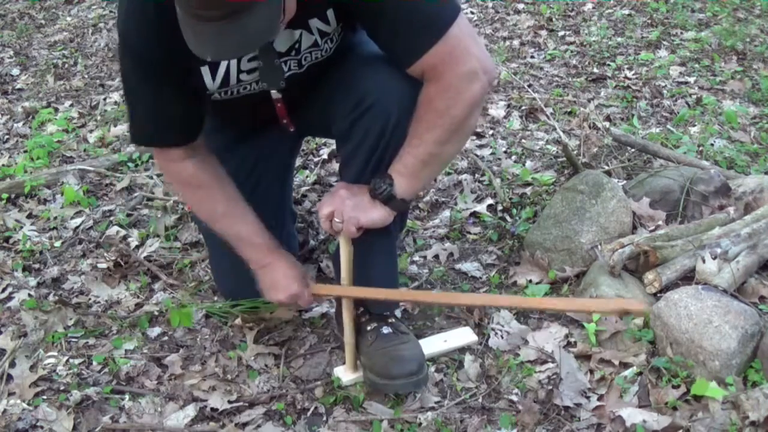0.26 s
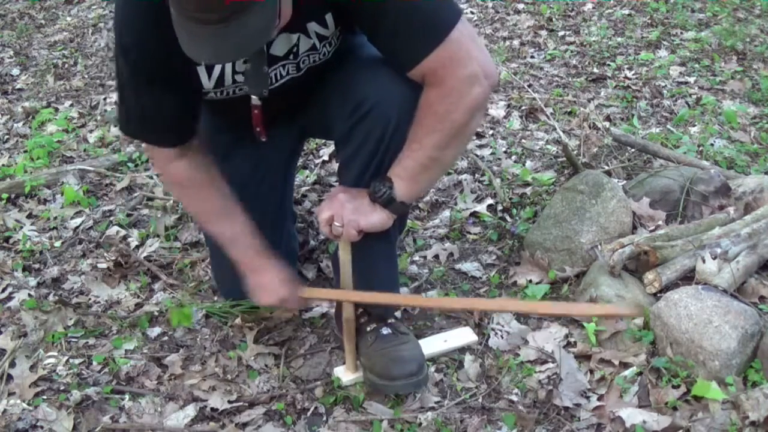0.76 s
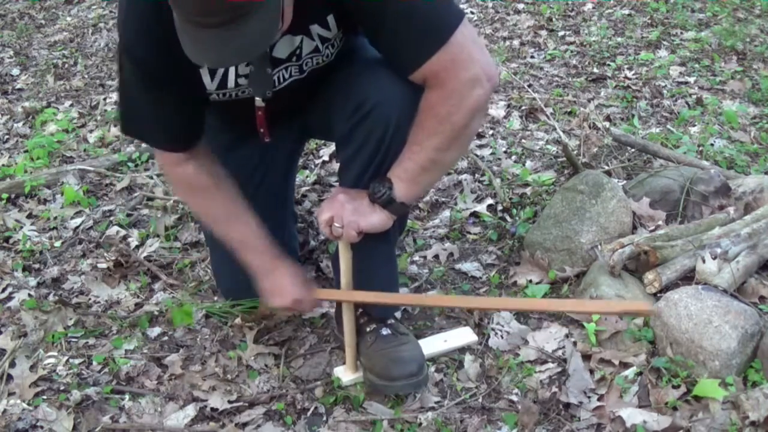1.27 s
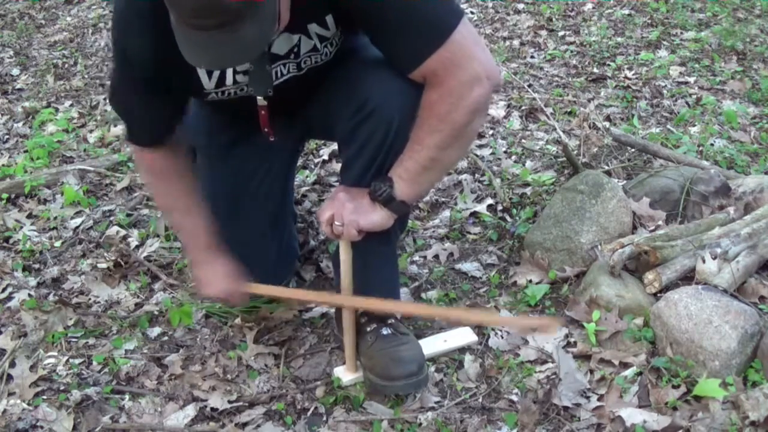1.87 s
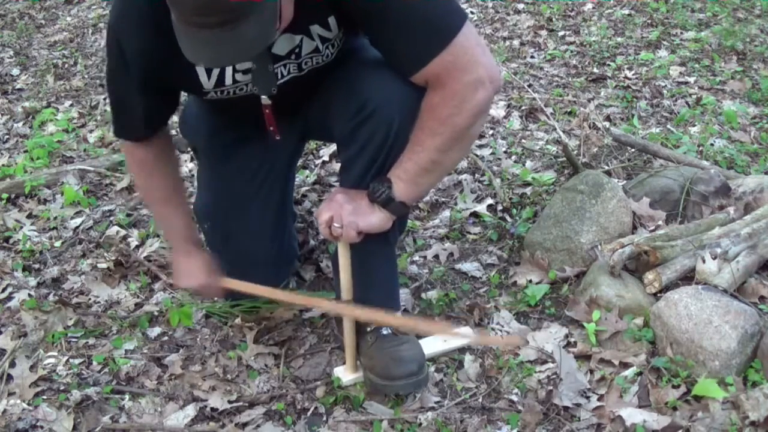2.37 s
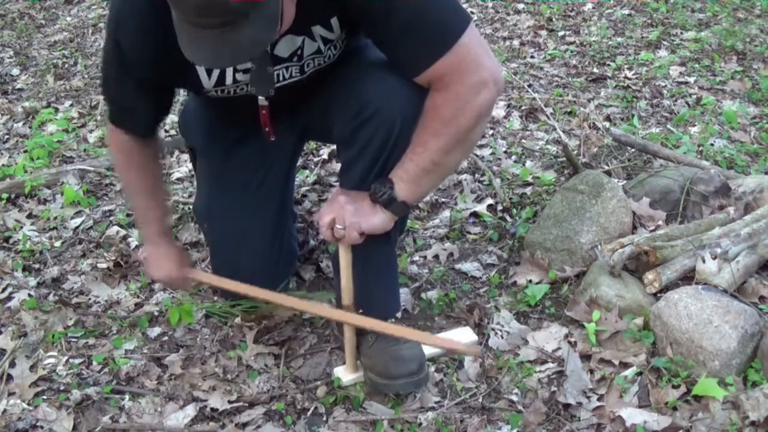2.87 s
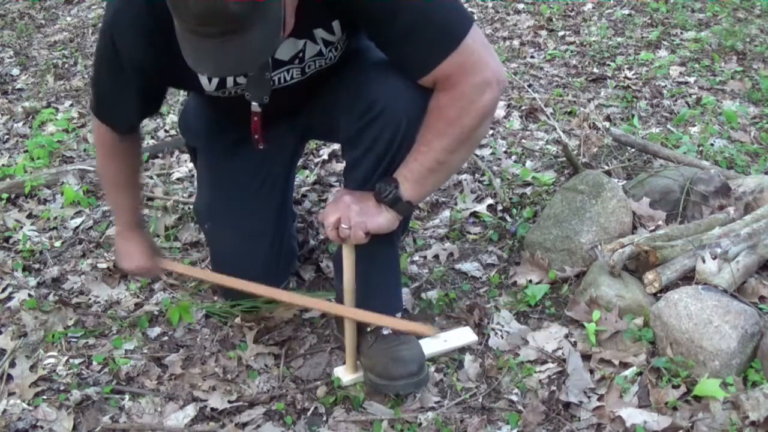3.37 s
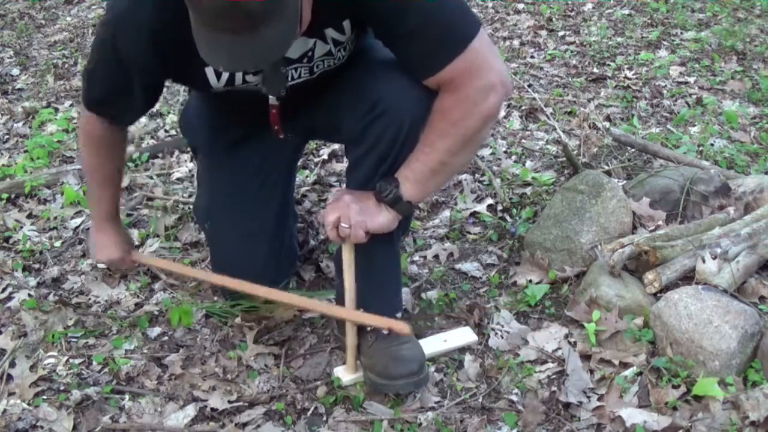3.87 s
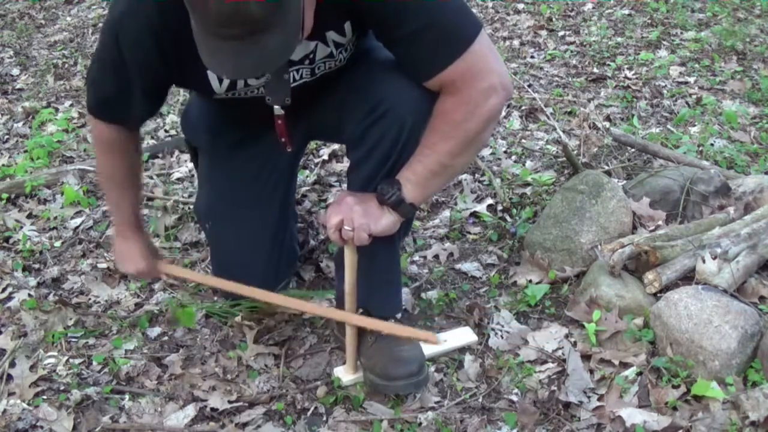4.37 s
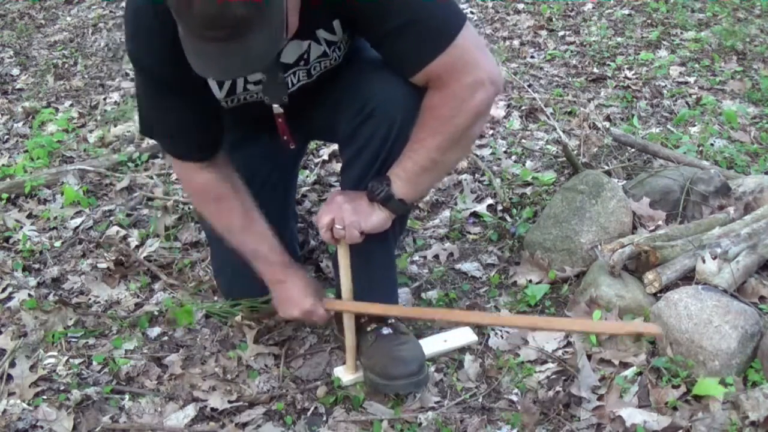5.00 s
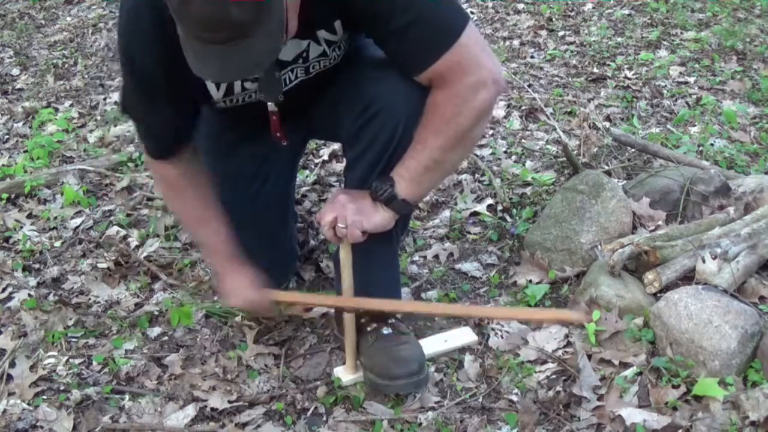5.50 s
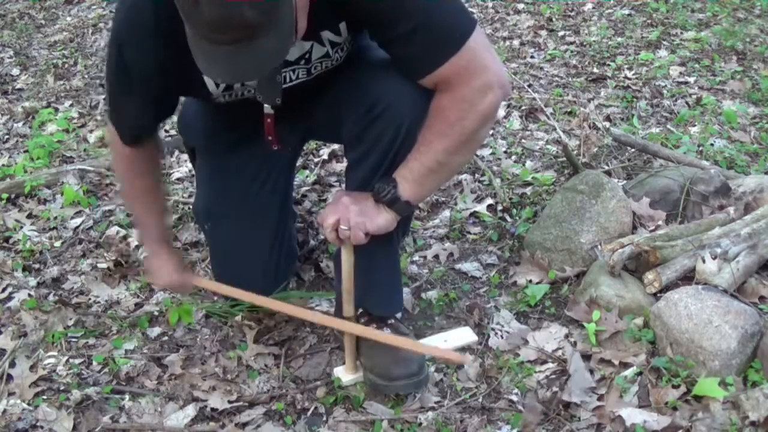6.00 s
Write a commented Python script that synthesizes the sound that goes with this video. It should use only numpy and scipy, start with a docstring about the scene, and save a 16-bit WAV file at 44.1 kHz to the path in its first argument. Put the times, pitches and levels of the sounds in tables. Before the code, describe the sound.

Rapid to-and-fro wooden rubbing, early chirpy squeaks turning to rougher grinding with brittle snaps, outdoors in breezy woodland with a far bird whistling.

```python
"""On the forest floor, a bow drill at work: a cord spins a wooden spindle to and fro in its hearth board.
Each stroke is filtered noise and tiny random slips that groan, grind, hiss and crackle with the speed.
Early turns squeak with sliding, rasping harmonics; later the tip bites and grinds, and clicks snap like fibres.
Short noise bursts ring the wood as knocks, slow-swelling noise makes the wind, and noise a hush of woods.
A bird far away whistles with sliding sine tones."""
import sys
import numpy as np
from scipy import signal
from scipy.fft import rfft, irfft
from scipy.io import wavfile
from scipy.ndimage import uniform_filter1d

SR = 44100
rng = np.random.default_rng(int(sys.argv[2]) if len(sys.argv) > 2 else 0)


def master(y):
    """Save y as 16-bit WAV."""
    cut = np.clip(np.atleast_2d(y).T, -1, 1)
    pcm = np.round(cut * 32767)  # scale
    wavfile.write(sys.argv[1], SR, pcm.astype(np.int16))


N = 275625
TIME = np.arange(N) / SR

# The spindle catches and slips as it reverses. Each row: start in seconds, length in seconds, level in dB,
# start pitch in Hz, end pitch in Hz, level of the pure ring in dB.
SQUEAKS = [(0.038, 0.015, -12.5, 1710, 2203, -4), (0.326, 0.011, -15, 1860, 2215, -11),
           (.594, 0.01, -12, 2040, 2145, -28), (0.8407, 0.017, -18, 1830, 2240, 5.5),
           (1.096, 0.013, -16.5, 1970, 2200, 4.5), (1.3284, 0.0101, -10.5, 1910, 2320, -22),
           (1.572, 0.0069, -14, 2040, 2190, -23), (4.356, 0.0033, -22.5, 1810, 1750, 10)]
# Rings of spindle and board that single slips set off.
# Each row: pitch in Hz, basic width in Hz, relative level in dB.
WOOD_MODES = [(946, 57, -13), (1804, 170, -6), (1860, 110, -1.5), (2990, 280, -4), (3197, 420, 5),
              (4004, 90, -9.5), (4460, 310, 1.5)]
# Tone colour of a snapping fibre. Each row: frequency in Hz, relative level in dB.
SNAP_COLOUR = [(600, -23), (2500, -26), (4800, -10), (6500, -5.5), (7600, -24), (9000, -1.5), (10400, 1.5),
               (12500, -4.5), (14000, -23.5), (16000, -22)]


def gain_of(db):
    """Turns decibels into a gain."""
    return 10 ** (np.asarray(db) / 20)


def evened(x):
    """Scales a sound to an rms (average strength) of 1."""
    return x / np.sqrt(np.mean(x ** 2) + 1e-20)


def peaked(x):
    """Scales a sound so that its tallest peak is 1."""
    return x / (abs(x).max() + 1e-20)


def read(points, hz):
    """Reads a table of frequencies and values between its rows, on a log-frequency axis."""
    f, value = np.transpose(points)
    return np.interp(np.log(hz + 1), np.log(f + 1), value)


def add(mix, s, sound):
    """Mixes a sound in at time s, in seconds."""
    part = mix[max(round(s * SR), 0):][:len(sound)]
    part += sound[:len(part)]


def colour(x, spectrum, size=2048):
    """Filters x to a given spectrum, with a response that starts at once and never ahead of the sound."""
    hz = abs(np.fft.fftfreq(size, 1 / SR))
    log_gain = np.log(gain_of(read(spectrum, hz)))
    # the Hilbert transform gives the phase that goes with this spectrum
    response = np.fft.ifft(np.exp(np.conj(signal.hilbert(log_gain)))).real[:size // 2]
    return signal.oaconvolve(x, response)[:len(x)]


def ring(x, hz, width_hz):
    """One damped mode (a way the wood rings), with gain 1 at its centre; a wider mode dies sooner."""
    r = np.exp(-np.pi * width_hz / SR)
    return 2 * signal.lfilter([1 - r], [1, -r * np.exp(2j * np.pi * hz / SR)], x).real


def wander(rate_hz):
    """Smooth random ups and downs of rms 1, fading out above a given rate."""
    hz = np.fft.rfftfreq(N, 1 / SR)
    slow = rfft(rng.standard_normal(N)) / (1 + (hz / rate_hz) ** 4)
    return evened(irfft(slow, N))


def chance_times(per_s):
    """Random moments, one for each whole event that a moving rate adds up to."""
    due = np.cumsum(per_s) / SR
    count = int(due[-1])
    marks = np.arange(count) + rng.random(N)[:count]
    return np.interp(marks, due, TIME)


def bow():
    """Spindle speed 0-1 and the drive of groan, grinding and hiss; the brighter sink further at each turn."""
    # The bow turns round, at the near and the far end by turns.
    # Each row: moment in seconds, rubbing that goes on through the turn in dB.
    turns = [(-0.2, 1), (0.042, -20), (0.317, -7), (0.574, -2.5), (0.835, -5.5), (1.092, -8), (1.322, -1.5),
             (1.551, -8), (1.785, -6), (2.02, -7.5), (2.252, -32), (2.493, -14), (2.737, -24), (2.977, -12),
             (3.202, -30), (3.444, -19), (3.667, -12), (3.905, -10), (4.127, -28), (4.351, -26),
             (4.569, -17), (4.797, -15), (5.007, -15), (5.237, -4), (5.446, -19), (5.656, -13),
             (5.872, -19), (6.1, -15), (6.33, -15)]
    # The tip wears in, bites, then glazes.
    # Each row: time in seconds, board groan in dB, grinding in dB, dry hiss in dB.
    wear = [(0.3, -48, -41, -32), (1.199, -43, -37.5, -32), (1.75, -44, -36, -28), (2.15, -43, -30, -31),
            (3.2, -36.5, -26, -30.5), (4.4, -33.5, -30.5, -31.5), (5.35, -32.5, -30.5, -30.5),
            (6.1, -34, -34, -33)]
    push_db = 0.6  # the push is harder than the pull, dB either way
    stick_s, stick_db = 0.012, -7  # before a squeak the spindle sticks, and its rubbing drops away

    turn_s, rest_db = np.transpose(turns)
    swing = -np.sin(np.pi * np.interp(TIME, turn_s, np.arange(len(turn_s))))  # positive on the push
    speed = abs(swing)
    rest = gain_of(np.interp(TIME, turn_s, rest_db))
    stuck = sum(np.exp(-abs(TIME - start + stick_s / 2) / stick_s) for start, *_ in SQUEAKS)
    drive = np.hypot(rest * (1 - speed), speed ** 0.95) * gain_of(push_db * swing + stick_db * stuck)

    s, *levels = np.transpose(wear)
    powers = (.85, 1.1, 1.15)
    return speed, [drive ** power * gain_of(np.interp(TIME, s, db)) for db, power in zip(levels, powers)]


def grit(per_s, spread_db):
    """Tiny slips of uneven size, at a rate that may move."""
    size = gain_of(spread_db * np.minimum(rng.exponential(1, N), 4.5))
    happens = rng.random(N) < per_s / SR
    return evened(size * rng.standard_normal(N) * happens)


def sing(modes):
    """Friction keeps every mode ringing; now one, now another stands out for a few milliseconds."""
    total = np.zeros(N)
    for hz, width, db in modes:
        once = ring(rng.standard_normal(N), hz, 1.6 * width)
        twice = ring(once, hz, 1.6 * width)
        total += gain_of(db) * evened(twice * gain_of(4.1 * wander(43)))
    return total


def spindle():
    """The tip's slips ring board and spindle; their pressure is uneven around each turn."""
    # Tone colours of the rubbing. Each row: frequency in Hz, relative level in dB.
    groan_colour = [(200, -48), (450, -16), (720, -14), (950, 2), (1300, -5.5), (1800, 3), (2200, -3.5),
                    (2600, 1.5), (3400, -47), (6000, -54)]
    grind_colour = [(2000, -19.5), (2600, -9.5), (3100, -2), (3400, -2), (3700, -6.5), (4100, 2),
                    (4450, -0.5), (4900, -2.5), (5600, -40), (7000, -24.5)]
    hiss_colour = [(2500, -15.5), (4400, -25), (5300, -2.5), (6000, 4), (6350, -1), (6700, 0),
                   (7500, -15.5), (7950, 5.5), (8500, -5), (10100, 10.5), (10800, 3), (11900, 0.5),
                   (13500, -9), (16000, -23)]
    # High rings of the dry tip. Each row: pitch in Hz, basic width in Hz, relative level in dB.
    tip_modes = [(4510, 490, 5), (6010, 200, 3), (8080, 370, -0.5), (9720, 160, -1), (11100, 300, -28)]

    speed, (groan, grind, hiss) = bow()
    chatter = wander(90)
    slips = grit(3000 + 9000 * speed, 1.1)  # more slips a second when the spindle is fast
    groaning = colour(grit(2500, 1.6), groan_colour)
    low = groan * evened(groaning * gain_of(3.0 * chatter + 1.9 * wander(50)))
    middle = grind * evened(colour(slips, grind_colour) * gain_of(2.0 * chatter + 1.8 * wander(84)))
    high = hiss * evened(colour(slips, hiss_colour) * gain_of(1.2 * chatter + 1.5 * wander(110)))

    # the pressed wood and the dry tip sing in their own modes
    singing = grind * evened(sing(WOOD_MODES) * gain_of(2.0 * chatter))
    ringing = hiss * evened(sing(tip_modes))

    # coarse crumbs jolt the wood, and charred dust crackles between the surfaces
    jolts = grit(130, 2.0)
    jolted = sum(gain_of(db) * evened(ring(jolts, hz, 2 * width)) for hz, width, db in WOOD_MODES)
    crumbs = grind * evened(jolted)
    crackle = hiss * speed * evened(colour(grit(140, 2.2), SNAP_COLOUR))

    rub = low + gain_of(-1.5) * middle + gain_of(-2.0) * high + gain_of(-9.0) * crackle
    return rub + gain_of(-3.5) * singing + gain_of(-7) * crumbs + gain_of(-6.5) * ringing


def gust(peak_s, length, db):
    """Level in dB of a gust that swells and dies in one arch, 3 dB down at the ends of its length."""
    return db - 10 * np.log10(1 + (2 * (TIME - peak_s) / length) ** 4)


def buffet(spectrum, level_db, lumpy_db):
    """Lumpy turbulence that reaches the two microphone ports partly alike and out of step."""
    # How alike the wind is at the two ports. Each row: frequency in Hz, likeness from 0 to 1.
    likeness = [(40, .87), (80, .87), (170, .68), (350, .75), (600, .6), (900, .5)]
    # How far the right port lags. Each row: frequency in Hz, phase in radians.
    lag = [(100, 0), (170, .55), (290, 1.5), (450, 1.85), (900, 1.8)]

    hz = np.fft.rfftfreq(N, 1 / SR)
    left, other = rfft(rng.standard_normal((2, N))) * gain_of(read(spectrum, hz))
    same = np.clip(read(likeness, hz), 0, 1)
    right = (same * left + np.sqrt(1 - same ** 2) * other) * np.exp(-1j * read(lag, hz))
    ports = irfft(np.array([left, right]), N) * gain_of(lumpy_db * wander(37.0))
    return gain_of(level_db) * ports / ports.mean(0).std()


def wind():
    """Gusts over a light breeze give a deep rumble and, when strong, a flutter above it."""
    # Gusts on the microphone.
    # Each row: strongest moment in seconds, length in seconds, rumble in dB, flutter in dB.
    gusts = [(0.25, 0.042, -23.5, -28.5), (0.35, 0.062, -26.5, -28.5), (0.52, 0.05, -28, -40),
             (1.249, 0.08, -24.5, -32.5), (1.347, 0.15, -24.5, -28), (1.707, 0.12, -22.5, -29),
             (1.82, 0.085, -24, -28.5), (2.005, 0.1, -22, -28), (2.243, 0.12, -27.5, -31),
             (2.492, 0.11, -26, -35), (3.216, 0.18, -25.5, -32), (3.783, 0.11, -23.5, -28),
             (3.988, 0.14, -28, -30.5), (4.158, 0.12, -19, -26), (4.301, 0.12, -22, -30.5),
             (5.052, 0.18, -25, -31), (5.262, 0.08, -25, -33), (5.433, 0.05, -26.5, -31),
             (5.57, 0.06, -25, -33), (5.895, 0.032, -23, -28), (6.009, 0.07, -24.5, -26),
             (6.167, 0.068, -24.5, -28.5)]
    # The breeze between gusts. Each row: time in seconds, level in dB.
    breeze = [(0.0, -34.5), (0.68, -30), (0.85, -37.5), (1.12, -42), (1.45, -27.5), (2.7, -33), (2.9, -28),
              (4.35, -30), (4.7, -32.5), (6.25, -32.5)]
    # Tone colours of the wind. Each row: frequency in Hz, relative level in dB.
    rumble_colour = [(15, -12), (30, -18), (60, -2), (130, 1), (210, -1), (300, -12.5), (500, -51),
                     (1500, -58), (4000, -95)]
    flutter_colour = [(120, -24), (250, 0), (330, -2), (450, -7), (650, -16), (1100, -31), (2500, -45),
                      (6000, -90)]

    breeze_db = np.interp(TIME, *np.transpose(breeze))
    rumbles = [gust(s, length, db) for s, length, db, _ in gusts]
    flutters = [gust(s, length, db) for s, length, _, db in gusts]
    rumble_db = np.max([breeze_db] + rumbles, axis=0)
    flutter_db = np.max([breeze_db - 8.5] + flutters, axis=0)  # the breeze flutters less than it rumbles
    return buffet(rumble_colour, rumble_db, lumpy_db=3.0) + buffet(flutter_colour, flutter_db, lumpy_db=3.0)


def forest():
    """The faint even hush of the woods: steady noise, partly shared by the two ears."""
    # Tone colour of the hush. Each row: frequency in Hz, relative level in dB.
    hush_colour = [(50, 0), (400, -1), (1000, -3), (2300, -9), (3200, -7), (4500, -12), (6000, -16),
                   (9000, -17), (10200, -12), (11500, -17), (13000, -22), (16000, -25)]
    near, left, right = (evened(colour(z, hush_colour)) for z in rng.standard_normal((3, N)))
    return gain_of(-45.5) * (near + .5 * np.array([left, right]))


def knock(db, hz):
    """A short rattle of contact rings the board, with a crack of treble on top."""
    # Tone colours of the wood and of the crack. Each row: frequency in Hz, relative level in dB.
    wood_colour = [(200, -20), (550, -7.5), (950, -0.5), (1500, -2), (2400, -3.5), (3200, -9.5),
                   (4500, -7.5), (9000, -52)]
    crack_colour = [(500, -20.5), (2000, -9), (3500, -8.5), (4600, 9.5), (5400, 2.5), (6400, 4),
                    (7600, -16), (10000, 7.5), (13000, -6), (16000, -35)]

    t = np.arange(SR // 20) / SR
    rattle, crack = rng.standard_normal((2, len(t)))
    contact = rattle * (np.exp(-t / 0.0036) + 0.033 * np.exp(-t / 0.0063))
    contact[0] += 2.5  # the first touch
    wood = peaked(colour(contact, wood_colour))
    wood = peaked(wood + .35 * peaked(ring(wood, hz, 300)))
    edge = peaked(colour(crack * np.exp(-t / 0.0032), crack_colour))
    # most knocks have the same crack; only the softest have less
    return gain_of(db + 3.0) * wood + gain_of(min(-11.5, db + 3.5)) * edge


def knocks():
    """The spindle rattles in its socket: knocks at set moments, and chance taps that thicken as the board
    groans."""
    # Knocks at set moments. Each row: start in seconds, relative level in dB, strongest ring in Hz.
    set_knocks = [(0.028, -17.5, 1910), (0.137, -17.5, 830), (0.172, -23.5, 1060), (0.198, -18.5, 910),
                  (0.284, -21, 1590), (0.539, -11.5, 1060), (0.658, -18, 950), (0.805, -24.5, 1030),
                  (1.048, -21, 1824), (1.283, -15.5, 1010), (1.46, -16, 1090), (1.554, -11.5, 2400),
                  (1.631, -18.5, 850), (1.661, -16, 912), (1.964, -12.5, 2450), (2.153, -15.5, 1760),
                  (2.65, -15, 1950), (3.102, -13, 1420), (3.157, -15, 1540), (3.455, -15.5, 1860),
                  (3.571, -13, 1860), (3.779, -15, 1560), (3.794, -11, 1790), (4.079, -14, 1840),
                  (4.302, -13.5, 870), (4.357, -16, 1320), (4.673, -17.5, 1820), (4.847, -22, 3050),
                  (4.924, -14.5, 1840), (5.393, -17.5, 1680), (5.532, -11.5, 1590), (5.608, -10, 1330),
                  (5.647, -9, 1890), (5.732, -19.5, 840), (5.831, -16, 1620), (6.195, -17.5, 880),
                  (6.238, -11.5, 1560)]
    taps_per_s, tap_db, tap_spread_db = 4.0, -21.5, 1.5  # average rate, relative level and its spread

    out = np.zeros(N)
    _, (groan, *_) = bow()
    for s, db, hz in set_knocks:
        add(out, s, knock(db, hz))
    for s in chance_times(taps_per_s * groan / groan.mean()):
        hz = WOOD_MODES[rng.integers(2)][0]  # one of the two low modes
        add(out, s, knock(tap_db + tap_spread_db * rng.standard_normal(), hz))
    return out


def squeaks():
    """Rasping stick-slip pulses slide in pitch and settle as their second harmonic swells to a pure ring."""
    # Tone colour of the squeaking spindle. Each row: frequency in Hz, relative level in dB.
    body_colour = [(1000, -27), (2200, -11.5), (3000, -0.5), (4300, 0), (5200, 2.5), (6200, -0.5),
                   (7400, -12.5), (8600, -0.5), (10000, 3), (11000, -1.5), (13000, -8.5), (16000, -9)]

    out = np.zeros(N)
    t = np.arange(SR // 20) / SR
    for s, length, db, start_hz, end_hz, ring_db in SQUEAKS:
        u = np.minimum(t / length, 1)  # progress from 0 to 1
        jitter, scrape = rng.standard_normal((2, len(t)))
        unsettled = (1 - u) ** 3
        shake_hz = 50 * evened(uniform_filter1d(jitter, size=30))
        hz = end_hz + unsettled * (start_hz - end_hz + shake_hz)
        phase = 2 * np.pi * np.cumsum(hz) / SR

        pulses = np.zeros(len(t))
        for k in range(1, 7):  # six harmonics of uneven strength
            strength = gain_of(2 * rng.standard_normal())
            pulses += strength * np.cos(k * phase + rng.uniform(0, 2 * np.pi))
        rasp = evened(colour(pulses + 1.1 * scrape, body_colour))
        bite = abs(np.sin(np.pi * u ** .5)) ** 1.3  # swells early
        swell = abs(np.sin(np.pi * u ** 1.35)) ** 1.7  # swells late
        tone = gain_of(ring_db) * swell * np.sin(2 * phase)
        after = gain_of(-19) * u * np.exp(-t / 0.011) * (np.sin(phase) + np.sin(2 * phase))
        add(out, s, gain_of(db) * (0.8 * bite * rasp + 1.24 * tone + 2 * after))
    return out


def snap(db):
    """One sharp click with its own ring and a few milliseconds of scatter; loud ones are brighter."""
    # Tone colour of the dull mid-range part. Each row: frequency in Hz, relative level in dB.
    dull_colour = [(500, -42), (2000, -20), (3500, -3), (4600, 11), (5400, 5.5), (6400, 8.5), (7600, 13.5),
                   (10000, -39)]

    t = np.arange(SR // 50) / SR
    click = 0.12 * rng.standard_normal(len(t)) * np.exp(-t / 0.0021)
    click[0] += 1
    fibre = peaked(ring(click, rng.uniform(8900, 14100), 1350))
    dull_db = -17 - db + 4.5 * rng.standard_normal()  # a louder snap has a smaller share of it
    dull = gain_of(dull_db) * peaked(colour(click, dull_colour))
    sound = peaked(colour(click, SNAP_COLOUR)) + 0.32 * fibre + dull
    return gain_of(db + 1.0) * peaked(sound)


def snaps():
    """Sharp clicks snap in quick fading runs, more often as the wood dries and chars."""
    # Runs at set moments. Each row: start in seconds, relative level of the first snap in dB, snaps in the run.
    set_runs = [(0.1503, 0, 1), (0.1806, -8.5, 2), (0.4874, -8.5, 1), (0.5795, -2.5, 2), (0.6971, -5, 2),
                (0.9735, 1, 1), (1.1812, 0.5, 2), (1.4357, 1, 1), (1.4608, -3.5, 2), (1.5137, -1, 2),
                (1.6034, 1, 2), (1.7178, -2, 1), (1.9114, -10, 2), (2.0557, -3, 1), (2.104, -7, 1),
                (2.1323, -3.5, 1), (2.3194, -1, 2), (2.386, -6, 2), (3.0595, -1.5, 1), (3.333, -4.5, 1),
                (3.3972, -2, 1), (3.4297, -3, 2), (3.521, -1.5, 2), (3.5592, -1.5, 1), (3.8511, -5, 2),
                (3.8873, -9, 1), (4.0402, -6.5, 1), (4.2883, -6, 1), (4.4493, -5, 1), (4.4719, -6, 2),
                (4.4903, -0.5, 1), (4.6162, -2, 1), (4.713, 1, 2), (4.7577, -5, 2), (4.8867, 2.5, 1),
                (5.2098, 2, 3), (5.25, -12.5, 2), (5.3173, 3, 2), (5.3473, 1, 2), (5.6193, 1, 1),
                (5.6465, -5, 2), (5.677, 3, 5), (5.7385, -0.5, 2), (6.0236, 2, 3), (6.0804, -5.5, 2),
                (6.1122, -5.5, 3), (6.2024, -1, 2), (6.2314, -2, 1)]
    # Further snaps come by chance as the spindle turns. Each row: time in seconds, runs a second at full speed.
    chance_rate = [(0.5, 5), (2.0, 15), (6.0, 24)]
    # relative level at full speed, its change at rest and its spread in dB, and the share that come as pairs
    full_db, rest_db, spread_db, pair_share = -9.0, -9.5, 1.5, 0.36
    run_gap_s, run_fade_db = 0.0076, 3.5  # the snaps of a run follow closely, each a little weaker

    out, runs = np.zeros(N), list(set_runs)
    speed, _ = bow()
    for s in chance_times(np.sqrt(speed) * np.interp(TIME, *np.transpose(chance_rate))):
        slowness = 1 - np.interp(s, TIME, speed)
        db = full_db + rest_db * slowness + spread_db * rng.standard_normal()
        runs.append((s, db, 1 + (rng.random() < pair_share)))
    for s, db, count in runs:
        for k in range(round(count)):
            add(out, s + k * run_gap_s * rng.uniform(.95, 1.05), snap(db - k * run_fade_db))
    return out


def bird():
    """Pure whistles hook quickly upwards, then slide down; the trees smear them with a fading echo."""
    # A far bird's whistles. Each row: start in seconds, length in seconds, pitch the slide starts from in Hz,
    # end pitch in Hz, relative level in dB.
    whistles = [(1.676, 0.19, 3630, 3100, -40), (2.336, 0.18, 3530, 2750, -40),
                (2.655, 0.18, 3550, 2800, -42), (2.984, 0.26, 3500, 2730, -46),
                (3.318, 0.16, 3480, 2700, -35), (3.652, .17, 3510, 2710, -32),
                (4.002, 0.19, 2070, 1700, -37.5), (4.443, 0.19, 2060, 1693, -36)]

    out = np.zeros(N)
    for s, length, top_hz, end_hz, db in whistles:
        t = np.arange(int(length * SR)) / SR
        hook = 1 - 0.189 * np.exp(-t / 0.0079)  # starts below the slide and soon joins it
        hz = np.geomspace(top_hz, end_hz, len(t)) * hook
        tone = np.sin(2 * np.pi * np.cumsum(hz) / SR)
        add(out, s, gain_of(db) * signal.windows.tukey(len(t), .2) * tone)
    t = np.arange(SR // 2) / SR
    trees = rng.standard_normal(len(t)) * gain_of(-60 * t / 0.4)  # falls 60 dB in 0.4 s
    smeared = signal.oaconvolve(out, trees / np.linalg.norm(trees))[:N]
    return 0.59 * out + gain_of(-8.0) * smeared


def litter(x):
    """Leaves and stones scatter a short echo, different at each ear."""
    t = np.arange(SR // 10) / SR
    # falls 60 dB in 16 ms, after a gap of 1 ms
    taps = rng.standard_normal((2, len(t))) * gain_of(-60 * t / 0.016) * (t > .001)
    dulled = colour(x, [(500, 4), (2000, 3), (5000, 1), (10000, -1), (16000, -2)])  # Hz, dB
    return signal.oaconvolve(dulled[None], taps / np.linalg.norm(taps[0]), axes=1)[:, :N]


def scene():
    """The drill straight ahead, in wind and woods."""
    outdoors = bird() + wind() + forest()
    drill = spindle() + squeaks() + knocks() + snaps()
    echo = gain_of(-21) * litter(drill)
    return drill + echo + outdoors


def record(dry):
    """A fast limiter holds the tallest peaks and briefly ducks what follows; then the top treble is cut."""
    over_db = np.maximum(20 * np.log10(abs(dry).max(0) + 1e-9) + 5, 0)  # how far above -5 dB
    fall = TIME * 220  # recovery in dB a second
    duck_db = uniform_filter1d(np.maximum.accumulate(over_db + fall) - fall, size=8)
    low_pass = signal.firwin(255, 16000, window=("kaiser", 9), fs=SR)  # edge in Hz
    return signal.oaconvolve(dry / gain_of(duck_db), low_pass[None], "same")


dry = scene()
out = record(dry)
master(out)
```